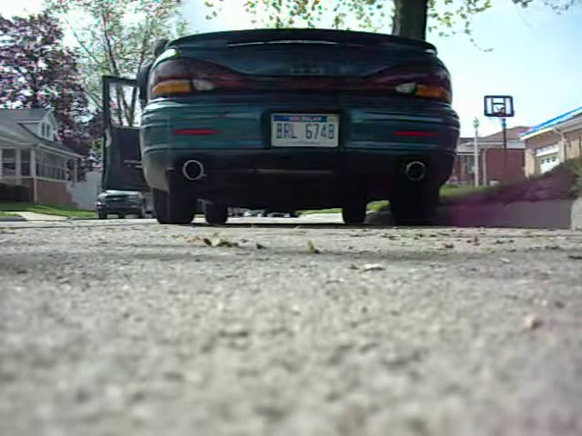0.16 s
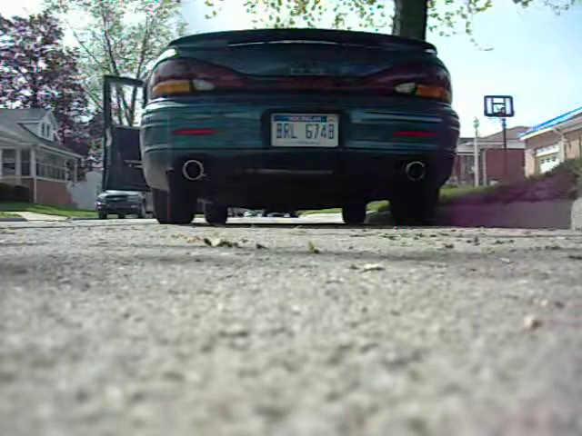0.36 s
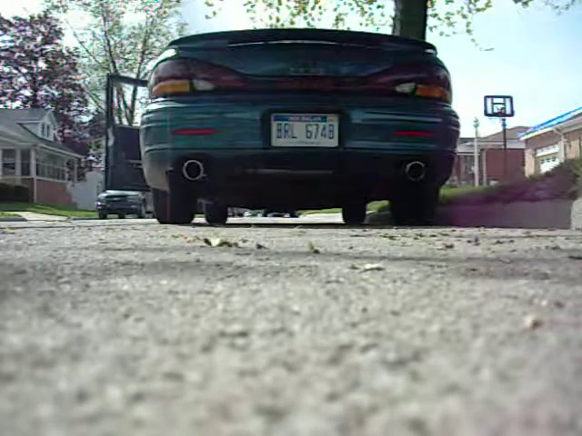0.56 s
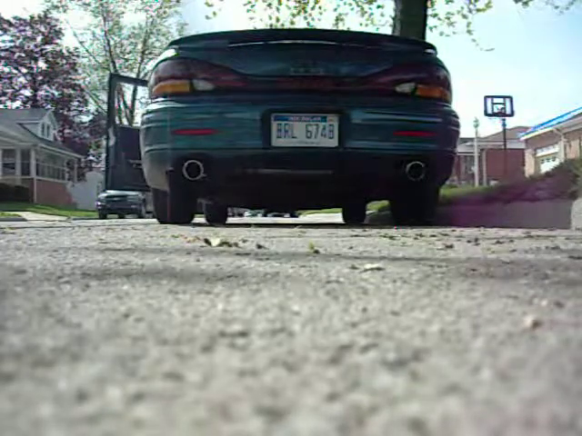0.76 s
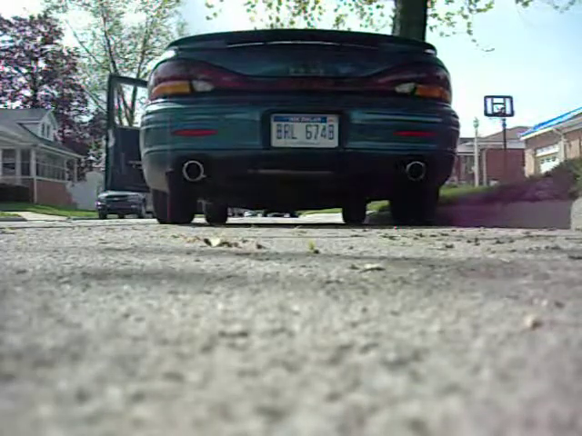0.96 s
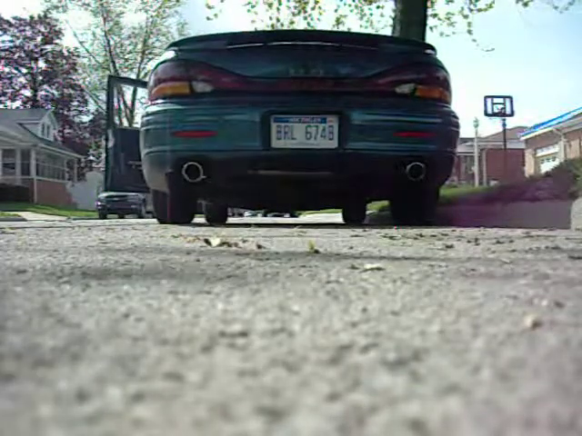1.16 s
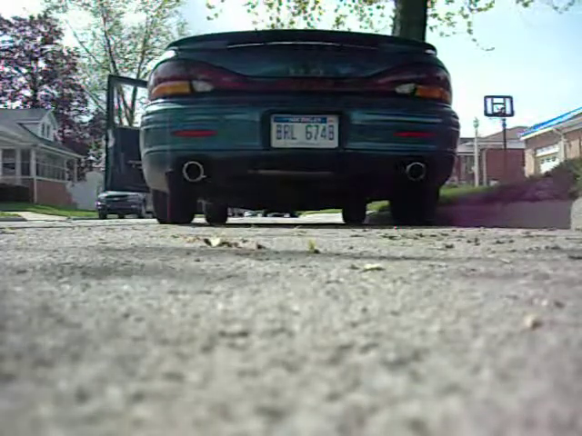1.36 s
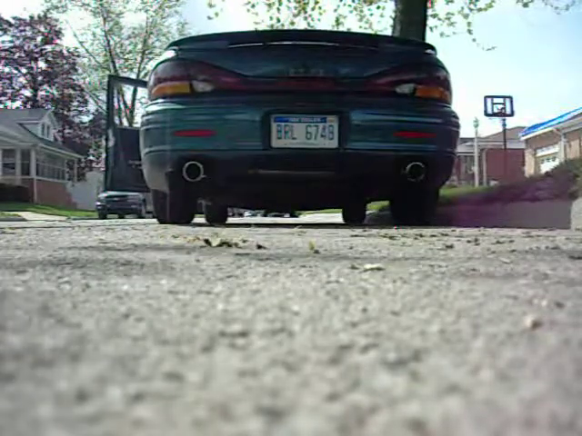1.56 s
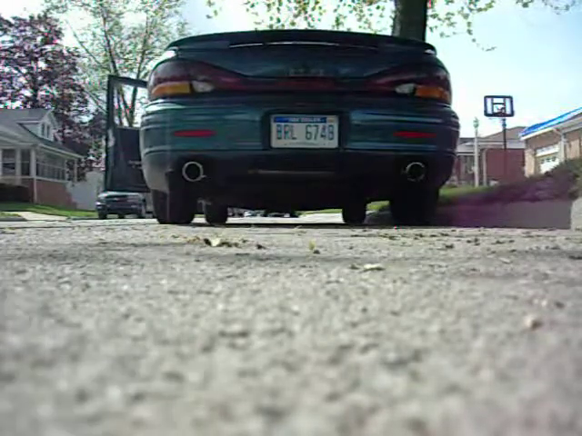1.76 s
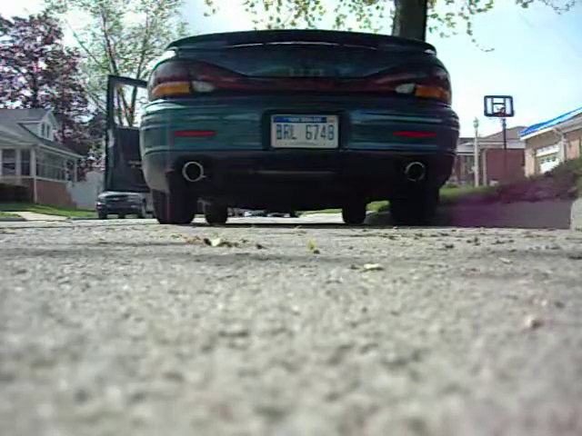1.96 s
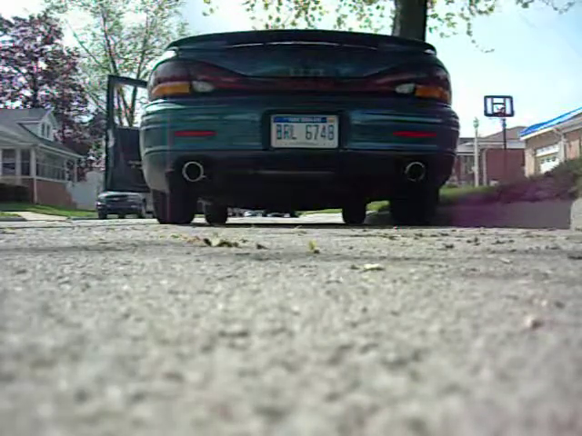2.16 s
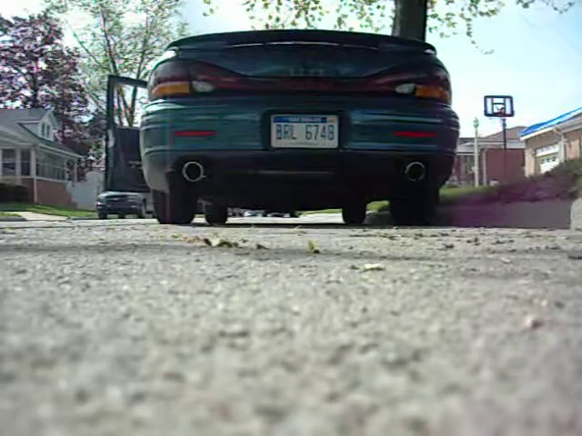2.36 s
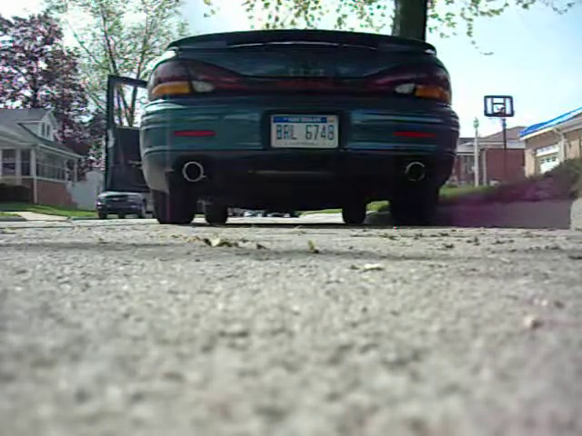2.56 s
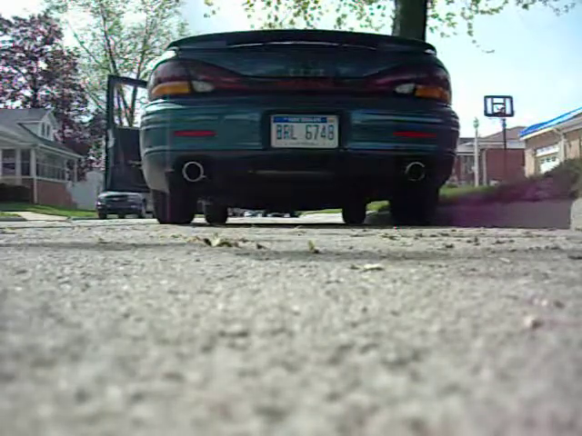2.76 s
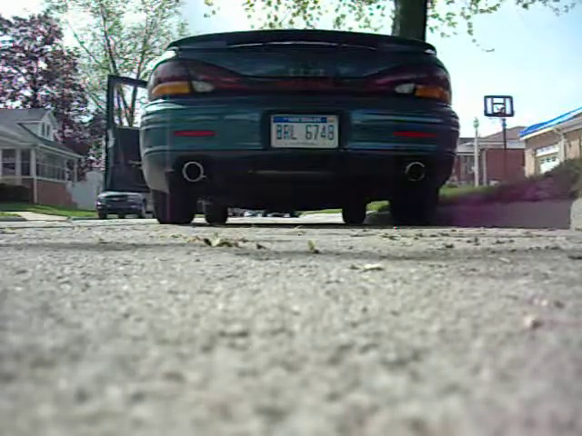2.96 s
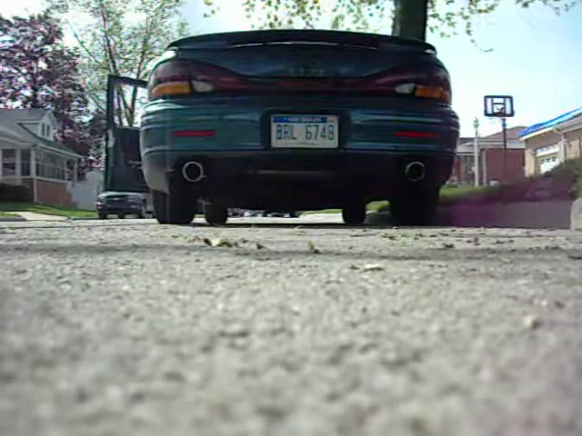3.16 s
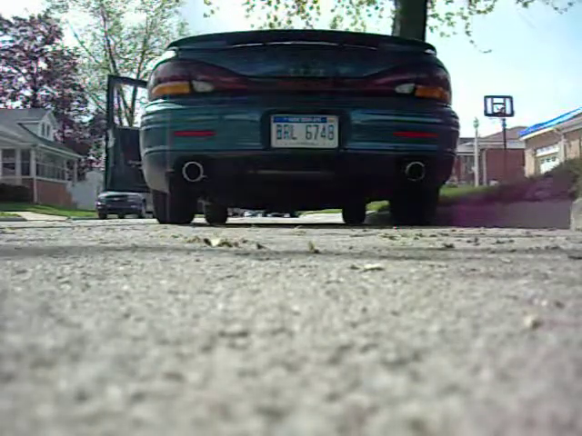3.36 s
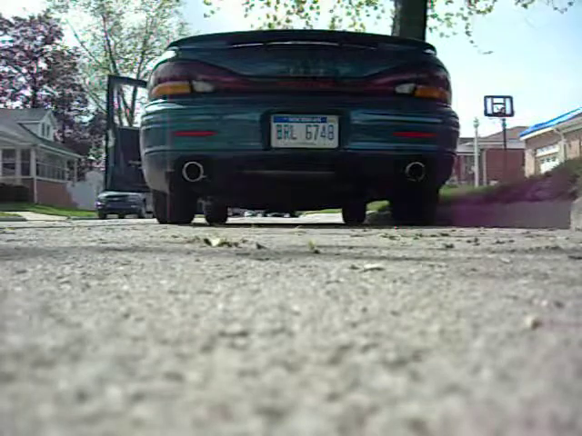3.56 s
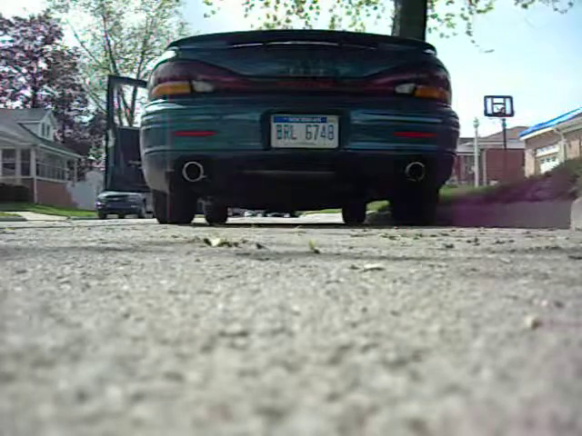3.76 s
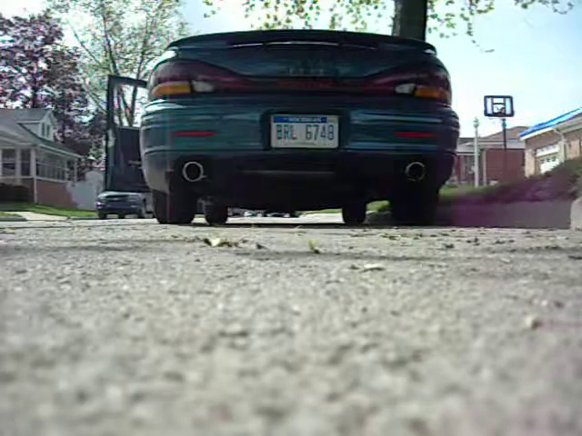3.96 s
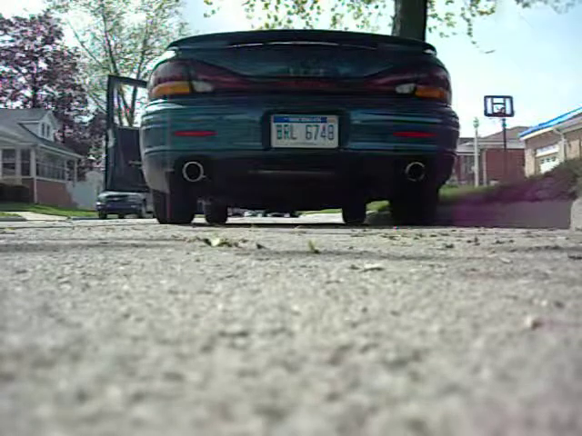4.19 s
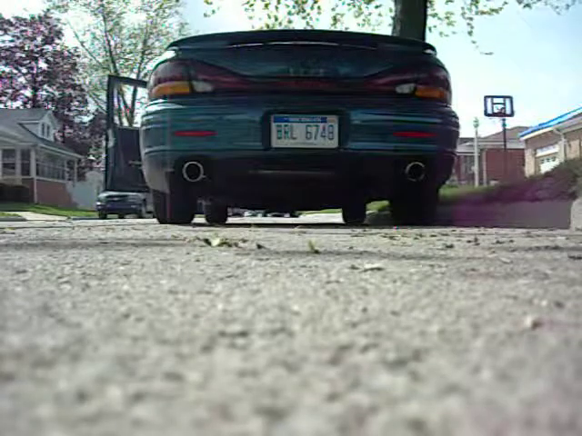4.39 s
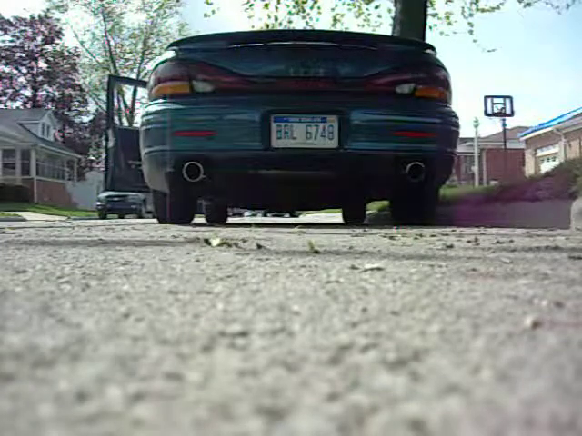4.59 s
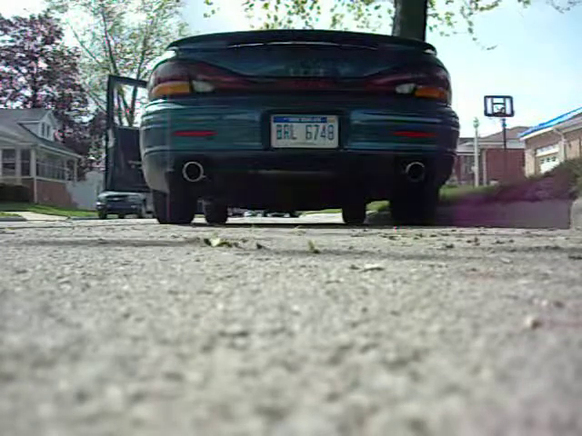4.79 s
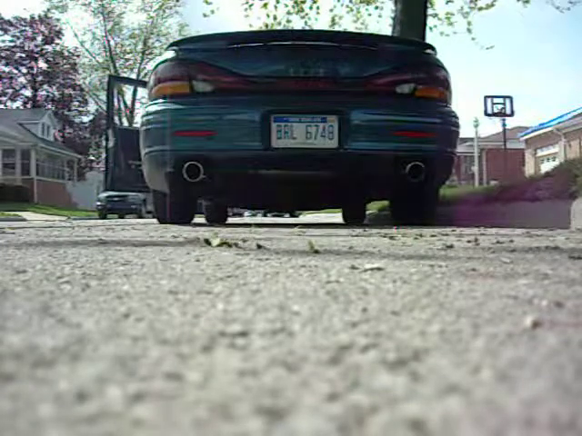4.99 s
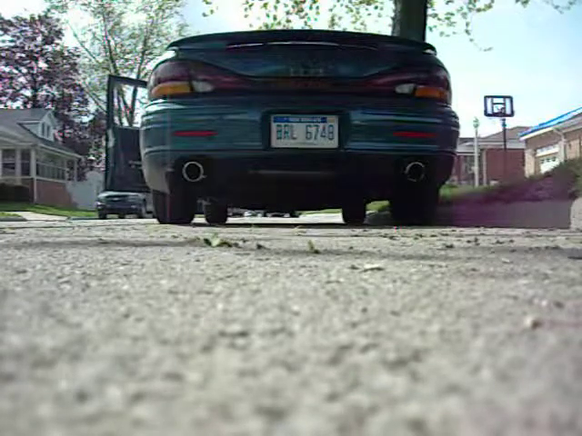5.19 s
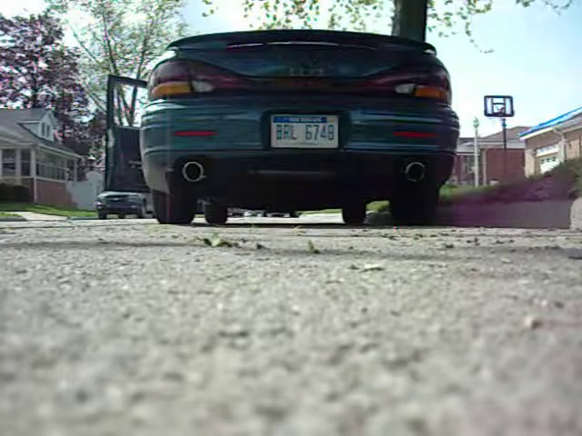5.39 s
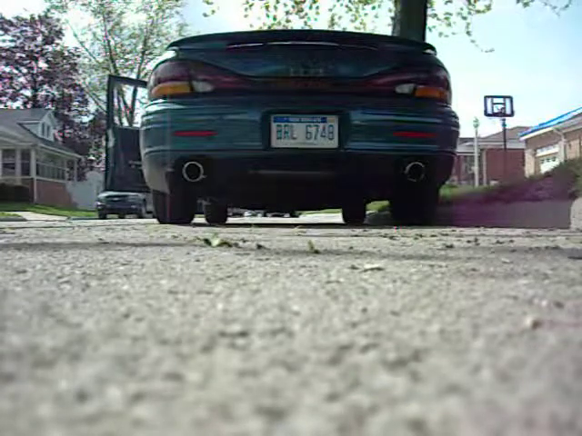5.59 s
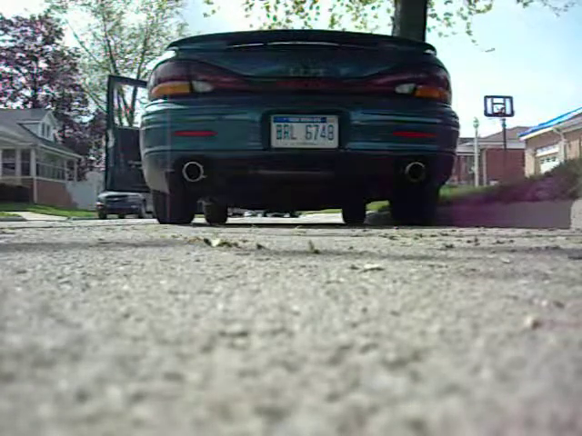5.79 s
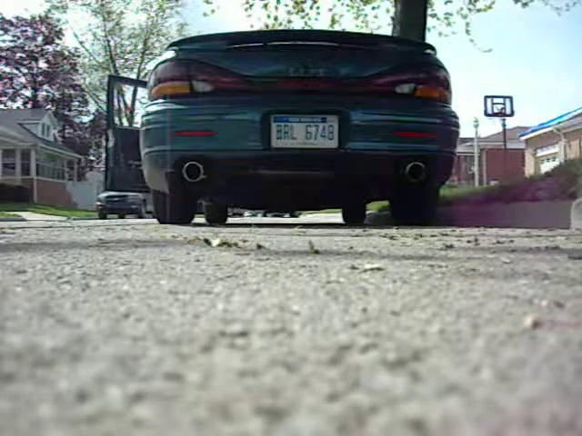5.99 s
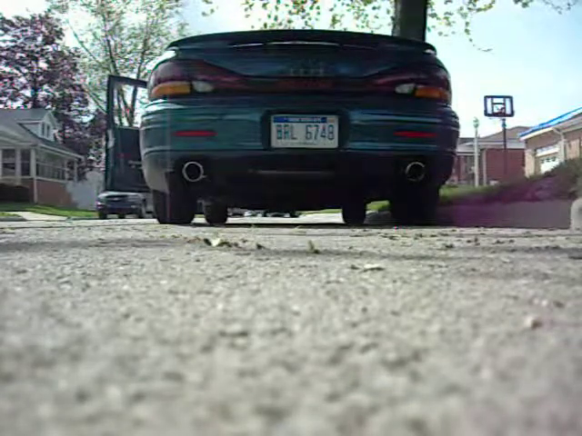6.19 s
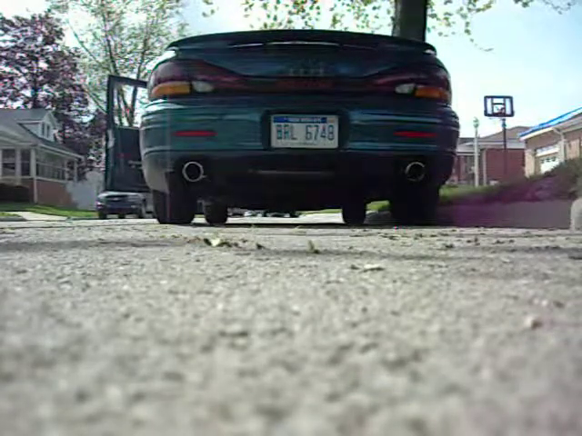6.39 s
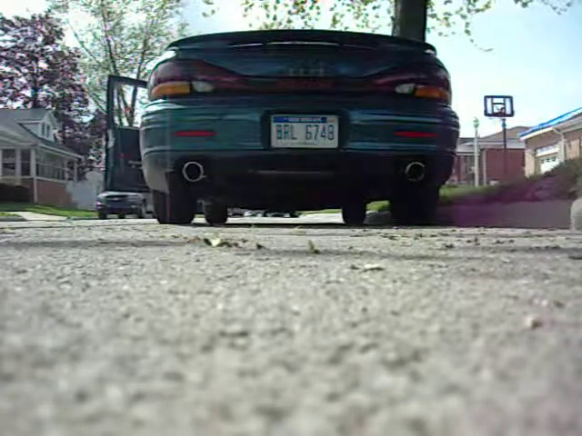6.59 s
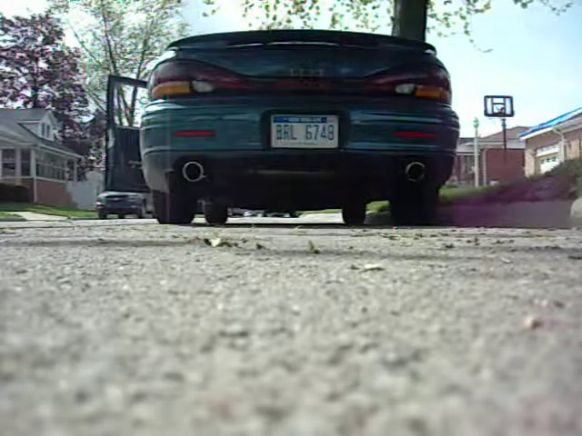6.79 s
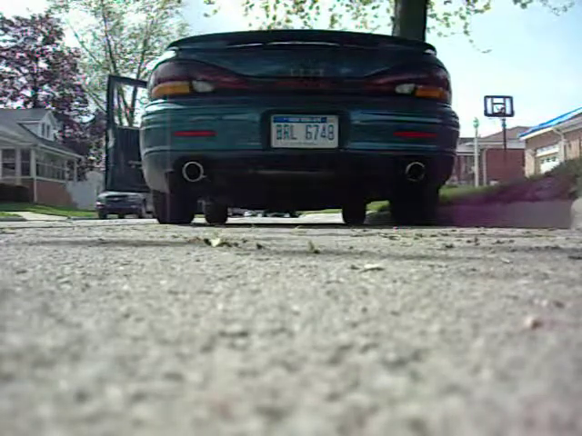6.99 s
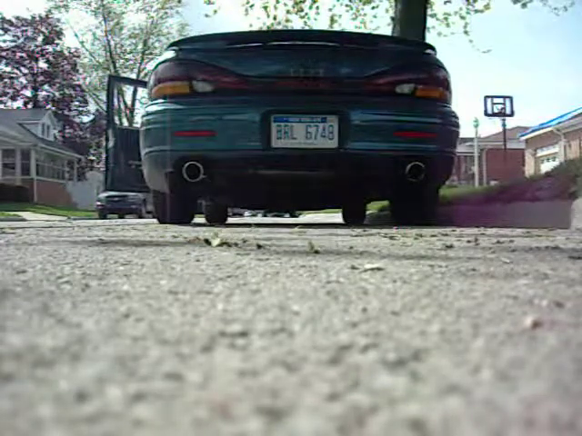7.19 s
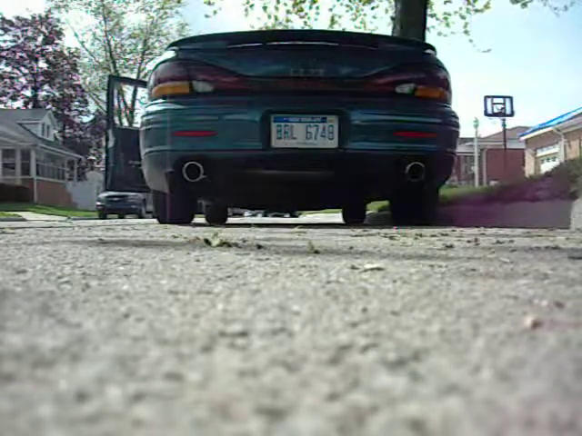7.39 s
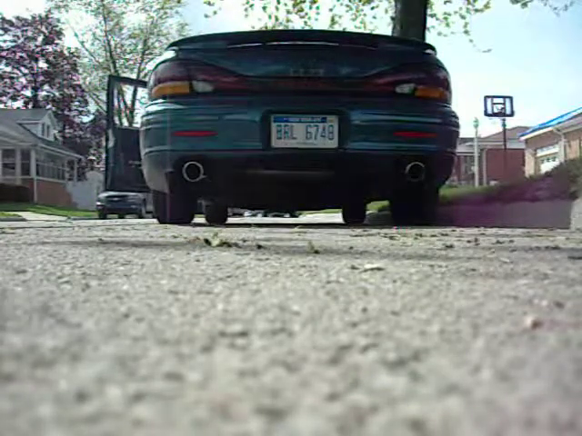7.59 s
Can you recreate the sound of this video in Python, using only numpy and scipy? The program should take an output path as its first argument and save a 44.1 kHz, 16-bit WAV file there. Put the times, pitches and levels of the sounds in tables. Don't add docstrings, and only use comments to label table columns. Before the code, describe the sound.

From the ground behind a parked car on a quiet residential street, faint traffic, sparrow chirps and small metallic key clicks come first. The starter slams in with a harsh, squealing grind, the engine catches, flares briefly, then stumbles with low thumps and pops before dropping into a throbbing, slightly uneven idle. Wind bumps the cheap, narrow-band microphone, and loud moments distort.

```python
import sys
import numpy as np
from scipy import signal
from scipy.fft import rfft, irfft, next_fast_len
from scipy.io import wavfile
from scipy.ndimage import map_coordinates

SR = 44100
rng = np.random.default_rng(int(sys.argv[2]) if len(sys.argv) > 2 else 0)


def nominal_scale(level):
    x = np.asarray(level, float) / 20
    return 10 ** x


def waveform_to_disk(signal):
    frames = np.transpose(np.atleast_2d(signal))
    scaled = np.clip(frames, -1, 1) * 32767
    samples = np.round(scaled).astype(np.int16)
    wavfile.write(sys.argv[1], SR, samples)


N = 337365
TIME = np.arange(N) / SR


def unit(x):
    return x / np.sqrt(np.mean(x ** 2) + 1e-20)


def seconds(length):
    return np.arange(int(length * SR)) / SR


def progress(length):
    return np.linspace(0, 1, round(length * SR))


def curves(rows):
    s, *cols = np.transpose(rows)
    return [np.interp(TIME, s, c) for c in cols]


def between(start, end, fade):
    return np.clip(np.minimum(TIME - start, end - TIME) / fade, 0, 1)


def swells(rows, rise, fall):
    s, hold, db = np.transpose(rows)[:, :, None]
    t = TIME[::32]
    away = rise * np.maximum(s - t, 0) + fall * np.maximum(t - s - hold, 0)
    return np.interp(TIME, t, np.linalg.norm(nominal_scale(db - away), axis=0))


def wobble(rate):
    coarse = TIME[::16]
    knots = rng.standard_normal(int(N * rate / SR) + 4)
    return np.interp(TIME, coarse, map_coordinates(knots, [coarse * rate]))


def filtered(x, response):
    m = next_fast_len(N + SR // 2)
    return irfft(rfft(x, m) * response(np.fft.rfftfreq(m, 1 / SR)), m)[:N]


def colour(points):
    f, db = np.transpose(points)
    return lambda hz: nominal_scale(np.interp(np.log(hz + 1), np.log(f + 1), db))


def modes(table):
    def response(f):
        total = 0
        for k, (c, w, db) in enumerate(table):
            total = total + (-1) ** k * nominal_scale(db) * 1j * f * w / (c * c - f * f + 1j * f * w)
        return total
    return response


def noise(response, gate=1):
    return unit(filtered(gate * rng.standard_normal(N), response))


def add(track, s, sound):
    part = track[round(s * SR):][:len(sound)]
    part += sound[:len(part)]


# f/Hz, level/dB
STREET = [(24, -31), (40, -12), (82, -1.5), (261, -11), (438, -9), (603, -9.5), (666, -7), (781, -9.5),
          (846, -10.5), (1510, -13), (1630, -13.5), (3480, -16.5), (4700, -43.5), (6110, -86),
          (10300, -120)]
# t/s, hold/s, level/dB
LEAVES = [
    (0, .01, -42.5),
    (7.2, .2, -33),
    (7.5, .2, -30),
]
# f/Hz, level/dB per Hz
FOLIAGE = [(2200, -41), (3000, -3), (3700, -4.5), (4300, -2), (4800, -40.5)]


def street():
    one_car = swells([(0.34, 0.034, -47)], rise=27, fall=47)
    level = np.hypot(nominal_scale(-45), one_car) * nominal_scale(0.86 * wobble(4.7) + 0.6)
    breeze = np.hypot(nominal_scale(-53.5), swells(LEAVES, rise=54, fall=55))
    return level * noise(colour(STREET)) + breeze * noise(colour(FOLIAGE), nominal_scale(2.9 * wobble(40)))


# t/s, hold/s, buffet level/dB
WIND = [(0, 0.0073, -41), (.45, .01, -42.5), (.7, 0.35, -47.5), (1.2, 0.17, -40.5), (1.47, .01, -36.5),
        (1.77, .01, -34.5), (2.3, 0.38, -48), (2.77, 0.27, -40), (3.19, .01, -24.5), (3.66, 0.028, -24),
        (4.73, .01, -32.5), (4.95, 0.49, -36.5), (5.73, 0.39, -26), (6.3, 0.19, -31.5), (6.8, 0.16, -31),
        (7.24, 0.0093, -29), (7.64, 0.0083, -32.5)]
# f/Hz, level/dB per Hz
RUMBLE = [(5.9, -38.5), (10, -3.5), (34, -2.5), (124, -18), (188, -28.5), (216, -30), (300, -29.5),
          (390, -61), (660, -120)]
# t/s, peak level/dB
GUSTS = [(.93, -38), (1.514, -33), (1.779, -32), (5.661, -20), (5.762, -16.5), (5.82, -15.5), (5.866, -21),
         (5.93, -21.5), (5.951, -19), (6.013, -14), (6.048, -18.5), (6.335, -23), (6.853, -20), (6.88, -28)]


def wind():
    sound = swells(WIND, rise=82, fall=76) * nominal_scale(3.5) * noise(colour(RUMBLE), nominal_scale(1.9 * wobble(17)))
    for s, db in GUSTS:
        u = np.linspace(-4, 4, round(rng.uniform(0.0065, 0.011) * SR))
        push = (u + 0.33) * np.exp(-u ** 2 / 2)
        add(sound, s - .004, rng.choice([-1, 1]) * nominal_scale(db + 4.0) * push)
    return sound


# t/s, peak level/dB, f/Hz, t60/s
KEY = [(0.168, -13, 2510, 0.012), (0.1724, -13, 2300, 0.025), (0.1842, -9.5, 2670, 0.014),
       (0.185, -16, 2340, .03), (1.5827, -21.5, 1890, 0.035), (1.672, -18, 3100, 0.03),
       (1.678, -8, 3690, 0.018), (1.733, -20.5, 2810, 0.35), (1.764, -18, 2900, 0.03),
       (1.767, -17.5, 3840, 0.04), (1.794, -32, 3330, 0.57), (1.833, -24.5, 3680, 0.62),
       (1.8808, -21.5, 3840, 0.28), (1.957, -19, 3000, 0.04), (1.965, -11, 3700, 0.04),
       (2.005, -20.5, 2900, 0.04), (2.01, -15, 3830, 0.05)]
# t/s, hold/s, level/dB
SCRAPE = [
    (1.674, 0.017, -27),
    (1.72, 0.074, -25),
    (1.825, .065, -27.5),
    (1.958, .014, -30),
    (2.01, .02, -32.5),
]
# f/Hz, width/Hz, level/dB
BARREL = [(1550, 72, 1), (2480, 120, 10.5), (2980, 160, -2.5), (3700, 200, 3)]
# f/Hz, level/dB per Hz
LOCK = [(450, -28), (800, -4.5), (1310, -13), (1560, -8), (1820, -7.5), (2490, -9), (3750, -4), (4270, -15),
        (4600, -46), (5980, -73), (10100, -120)]


def key():
    slide = between(1.66, 2.06, 0.021) * swells(SCRAPE, rise=1500, fall=170) * nominal_scale(-5.0)
    sound = slide * noise(lambda f: colour(LOCK)(f) * (1 + modes(BARREL)(f)), nominal_scale(2.3 * wobble(200)))
    t = seconds(0.1)
    attack = np.minimum(t / 0.00069, 1)
    for s, db, hz, t60 in KEY:
        partner = hz * rng.uniform(0.73, 0.94)
        ring = np.sin(2 * np.pi * hz * t) + 0.34 * np.sin(2 * np.pi * partner * t)
        rasp = 0.5 * rng.standard_normal(len(t))
        decay = nominal_scale(db - 5 - 60 * t / np.clip(t60, .006, .05))
        add(sound, s, decay * (ring + rasp) * attack)
    return filtered(sound, lambda f: f ** 2 / (f ** 2 + 1100 ** 2))


# t/s, length/s, start f/Hz, peak level/dB
SLURS = [
    (1.058, 0.032, 4116, -29),
    (1.095, 0.024, 3750, -30.5),
    (1.285, .034, 4000, -32.5),
]
CHIRPS = [(.201, 0.049, 3850, -41), (.922, 0.052, 3400, -37), (1.374, 0.045, 2700, -46),
          (1.075, 0.017, 3780, -32), (1.263, 0.028, 3980, -38), (4.294, .018, 3900, -24),
          (4.316, 0.017, 3820, -25), (4.33, .03, 3640, -26.5), (7.073, 0.03, 3900, -25.5),
          (7.128, .025, 3700, -24), (7.194, 0.014, 3830, -28)]
SLIDES = [
    (.238, 0.025, 3780, -45),
    (.8, .12, 3070, -39),
    (1.5, 0.16, 3140, -41.5),
    (0.96, 0.11, 3640, -49),
]
WHISTLES = [
    (.688, 0.03, 3530, -26),
    (.67, 0.17, 3110, -44),
    (.69, 0.1, 2330, -50),
    (1.31, 0.37, 3110, -46),
    (1.42, 0.042, 2635, -37),
    (2.03, 0.19, 3470, -53),
]
LIFTS = [
    (.822, .024, 3950, -30.5),
    (0.93, 0.01, 2950, -37),
    (.522, 0.027, 3830, -33),
    (.995, 0.055, 3890, -34.5),
    (1.496, 0.083, 1500, -45),
]
DROPS = [
    (.509, .024, 4260, -30.5),
]
GLIDES_HZ_PER_S = (-23000, -10500, -2200, -300, 2605, -36000)


def birds():
    sound = np.zeros(N)
    for calls, glide in zip((SLURS, CHIRPS, SLIDES, WHISTLES, LIFTS, DROPS), GLIDES_HZ_PER_S):
        for s, length, start_hz, db in calls:
            u = progress(length)
            quaver = 60 * np.interp(u, np.linspace(0, 1, 40), rng.standard_normal(40))
            pitch = start_hz + glide * length * u ** .65 + quaver
            swell = np.sin(np.pi * u ** .75) ** 0.7
            add(sound, s, nominal_scale(db) * swell * np.sin(2 * np.pi * np.cumsum(pitch) / SR))
    t = seconds(1 / 3)
    walls = rng.standard_normal(len(t)) * nominal_scale(-60 * t / 0.31) * (t > .01)
    echo = signal.fftconvolve(sound, walls / np.linalg.norm(walls))[:N]
    return sound * nominal_scale(2.3 * wobble(90)) + nominal_scale(-7.5) * echo


# t/s, hold/s, grind level/dB
CRANK = [
    (2.746, .008, -13),
    (2.767, .01, -12),
    (2.792, .012, -10.5),
    (2.928, 0.011, -13),
    (3.099, .19, -9.5),
]
# t/s, hold/s, grind level/dB
BITES = [
    (2.621, 0.022, -4),
    (3.016, .042, -10),
]
# t/s, hold/s, grind level/dB
FREE = [
    (2.66, .07, -19.5),
    (2.82, .09, -24.5),
    (2.876, 0.01, -19.5),
    (2.95, 0.076, -15.5),
    (3.3, 0.082, -23.5),
]
# f/Hz, width/Hz, level/dB
GEARS = [(1850, 75, -7), (2393, 17, -2.5), (2750, 46, -4.5), (3110, 250, -1.5), (3210, 45, 1.5),
         (3560, 41, -1), (3900, 810, 2.5)]
# f/Hz, level/dB per Hz
HOUSING = [(710, -48.5), (1200, -20), (1440, -15.5), (1860, -6), (2550, -10.5), (2750, -4.5), (3150, -2.5),
           (3700, -6.5), (4700, -25.5), (6110, -66), (10300, -120)]


def starter():
    strokes = swells(CRANK, rise=550, fall=450)
    bites = swells(BITES, rise=1900, fall=470)
    load = np.linalg.norm([strokes, bites, swells(FREE, rise=210, fall=300)], axis=0)
    freed = [(s + hold + 0.018, .01, db - 23) for s, hold, db in CRANK]
    freed += [(s + hold, .01, db - 22) for s, hold, db in BITES]
    freed += [(2.8, .045, -28), (2.6, .5, -37.5), (3.15, .4, -25.5)]
    loose = swells(freed, rise=460, fall=280)
    teeth = nominal_scale(1.5 * wobble(300))
    whine = np.zeros(N)
    for hz, width, db in GEARS:
        phase = 2 * np.pi * np.cumsum(hz * (1 + .022 * wobble(22))) / SR
        whine += nominal_scale(db + 3.0 * wobble(40)) * wobble(1.2 * width) * np.sin(phase)
    grind = .3 * unit(whine) + 0.7 * noise(colour(HOUSING), teeth)
    growl = noise(modes([(510, 190, -13), (787, 55, 3.5), (985, 76, 4.5), (1350, 110, 3.5)]), teeth)
    return between(2.605, 3.42, 0.02) * (load * grind + loose * growl)


# t/s, length/s, f/Hz, level/dB
SQUEALS = [(2.622, 0.038, 3158, -3.5), (2.624, 0.052, 3560, -18), (2.665, 0.043, 1900, -26),
           (2.698, .02, 2410, -23), (2.745, .038, 3610, -12.5), (2.75, 0.04, 1800, -25.5),
           (2.748, .009, 3510, -11), (2.792, .012, 2895, -10), (2.937, .01, 2997, -10.5),
           (2.765, .033, 3270, -10), (2.778, 0.023, 2892, -9.5), (2.8, 0.024, 3130, -17),
           (2.878, 0.018, 2860, -20), (2.9, 0.031, 2420, -16.5), (2.912, .04, 1850, -18),
           (2.922, 0.035, 2790, -12), (2.924, .03, 3225, -14), (2.948, 0.0203, 2060, -22),
           (3.016, 0.032, 3080, -9), (3.03, 0.039, 2060, -21.5), (3.034, 0.025, 3680, -16.5),
           (3.044, 0.022, 2840, -16), (3.066, 0.032, 3160, -14), (3.099, 0.027, 3220, -13),
           (3.13, .032, 1930, -17.5), (3.134, .028, 3665, -15.5), (3.143, 0.022, 2850, -17.5),
           (3.25, 0.017, 3270, -19), (3.272, 0.033, 1680, -13), (3.274, 0.023, 3750, -13),
           (3.277, .02, 3150, -15)]


def squeals():
    sound = np.zeros(N)
    for s, length, hz, db in SQUEALS:
        u = progress(length)
        phase = 2 * np.pi * np.cumsum(hz * (1 - .02 * u)) / SR
        add(sound, s, nominal_scale(db) * np.sin(np.pi * u ** 0.57) * np.sin(phase))
    return sound


# t/s, peak level/dB, thud level/dB
KNOCKS = [
    (2.623, -1.5, -0.5),
    (2.772, -10.5, -23.5),
    (2.79, -9, -20.5),
    (2.926, -12, -22),
    (3.019, 3.5, -24.5),
    (3.053, -8, -20),
    (3.095, -10, -22.5),
]


def pinion():
    sound, t = np.zeros(N), seconds(1 / 8)
    soften = signal.butter(2, 1100, fs=SR)
    for s, db, thud_db in KNOCKS:
        clang = np.zeros(len(t))
        for hz, _, level in GEARS:
            struck = nominal_scale(level + rng.normal(0, 2.8))
            clang += struck * np.sin(2 * np.pi * hz * rng.normal(1, 0.013) * t)
        dull = unit(signal.lfilter(*soften, rng.standard_normal(len(t))))
        thud = nominal_scale(thud_db - 60 * t / 0.072) * dull
        add(sound, s, nominal_scale(db - 14.0) * (nominal_scale(-60 * t / 0.078) * clang + thud))
    return sound


# f/Hz, width/Hz
NOTCHES = [(492, 20), (772, 17), (890, 44)]


def notched(f):
    return np.prod([(c * c - f * f + .3j * f * w) / (c * c - f * f + 1j * f * w) for c, w in NOTCHES], axis=0)


# f/Hz, width/Hz, level/dB
PIPE = [(287.5, 36, -1.5), (404.7, 41, 1), (467, 32, 1.5), (600, 60, -1.5), (682.7, 34, 3), (791, 63, -7)]


def roar(turn, cycle, effort_db, octaves):
    firing = 1 + 0.16 * np.cos(2 * turn) + 0.14 * np.cos(3 * turn)

    def pipe(table, swing):
        response = lambda f: modes(table)(f) * notched(f) * f ** 4 / (f ** 4 + 300 ** 4)
        return noise(response, (firing + swing) * nominal_scale(.6 * wobble(25)))

    level_db = -31 + 0.72 * effort_db + 4.5 * octaves
    lower = nominal_scale(level_db - 6.5) * pipe(PIPE[:3], 0.17 * np.cos(cycle + 2.5))
    upper = nominal_scale(level_db - 4.0) * pipe(PIPE[3:], .24 * np.cos(cycle))
    clears = .62 + (1 - .62) * between(2.5, 9, .05)
    return clears * (lower + upper)


# t/s, hold/s, level/dB
BARKS = [
    (3.085, 0.093, -22),
    (3.21, .05, -23),
    (3.3, 0.09, -19),
    (3.4, .13, -23),
]
# f/Hz, width/Hz, level/dB
UPPER_PIPE = [(250, 80, -11.5), (438, 70, -2.5), (554, 68, -4.5), (606, 33, 0), (681, 55, -4),
              (796, 89, -11)]


def bark(turn):
    jittered = 2 * turn + .16 * wobble(30) + 0.21 * np.sin(turn)
    pulses = np.exp(130 * (np.cos(jittered) - 1)) * nominal_scale(2.0 * wobble(60))
    gas = np.exp(.8 * np.cos(2 * turn)) * rng.standard_normal(N)
    blast = .66 * 3 * unit(pulses) + (1 - .66) * unit(gas)
    ringing = filtered(blast, lambda f: modes(UPPER_PIPE)(f) * f ** 3 / (f ** 3 + 300 ** 3))
    return swells(BARKS, rise=810, fall=420) * unit(ringing)


# order, level/dB, share of effort
ORDERS_LOW = [(2, 0.9, 1.013), (3, -4.5, 1.3), (4, -0.43, 0.38)]
# order, level/dB re order 3
UPPER = [(5, -13), (6, -19.5), (7, -16.5), (8, -35), (9, -34), (2.5, -20), (3.5, -24.5)]
# f/Hz, level/dB
MUFFLER = [(38, -26), (45, -21.5), (51, -16), (60, -16.5), (70, -21), (91, -19.5), (101, -27.5), (160, -35)]
# t/s, hold/s, level/dB
MISSED = (3.62, 0.09, -19)


def throb(turn, beat_hz, effort_db):
    cut = swells([MISSED], rise=130, fall=230)
    coasting = swells([(3.58, 0.51, 0)], rise=230, fall=120)
    loaded = np.clip(effort_db / 9, 0, 1)
    twist_rad = {3: -1.2, 4: 0.98}
    gains = {}
    for order, db, share in ORDERS_LOW:
        gains[order] = nominal_scale(db + share * effort_db) * colour(MUFFLER)(order * beat_hz)
    gains[3] = gains[3] * nominal_scale(-21 * cut / cut.max() - 3.5 * between(3, 3.25, .03))
    for order, db in UPPER:
        gains[order] = gains[3] * nominal_scale(db - 8.5 * coasting - 0.27 * effort_db)
    gains[0.95] = cut
    sound = np.zeros(N)
    for order, gain in gains.items():
        chance = wobble(16)
        ragged = nominal_scale(0.87 * chance - 4.5 * coasting * np.abs(chance))
        lag = twist_rad.get(order, 0) * loaded - .4 * (order - 3) ** 2
        sound += np.sqrt(2) * gain * ragged * np.sin(lag - order * turn)
    return sound


# t/s, hold/s, level/dB
STUMBLE = [
    (3.1, 0.5, -31),
    (3.58, 0.24, -19),
    (3.98, 0.012, -25),
    (4.1, 4.7, -37),
]
# f/Hz, level/dB per Hz
BURBLE = [(30, -14.5), (42, 5), (95, 0), (150, -5), (200, -26), (300, -48.5)]


def burble():
    return swells(STUMBLE, rise=66, fall=120) * noise(colour(BURBLE))


# f/Hz, level/dB per Hz
BAY = [(120, -51), (170, -18), (330, -14), (450, -7.5), (650, -3), (890, -8), (1660, -9.5), (1880, -3.5),
       (2220, -8.5), (3510, -6.5), (3900, -12.5), (4320, -27), (4700, -49), (6000, -120)]
# f/Hz, width/Hz, level/dB
COVERS = [(1540, 39, 0.5), (1900, 17, -9), (2780, 78, -3), (3600, 150, -23.5)]


def clatter(turn, cycle, effort_db, octaves):
    swing = 1 + 0.043 * np.cos(4 * turn) + .072 * np.cos(cycle + 1)
    valves = swing * nominal_scale(0.78 * wobble(60) + 0.37 * wobble(5.7))
    bay = noise(lambda f: colour(BAY)(f) * notched(f) * (1 + .5 * modes(COVERS)(f)), valves)
    return nominal_scale(-28 + 0.44 * effort_db + 5.5 * octaves + 0.9) * bay


# t/s, exhaust beat f/Hz, effort level/dB re idle
ENGINE = [(3.07, 18.5, 2), (3.132, 21.6, 8.5), (3.22, 28.6, 11.5), (3.296, 37.4, 14), (3.396, 41, 10.5),
          (3.512, 42.7, 8), (3.572, 38.5, 4), (3.668, 39, 3.5), (3.8, 36.8, -3), (3.966, 27.7, -2),
          (4.048, 28.3, -2), (4.3, 24.6, -0.5), (4.6, 23.37, 0), (5.1, 22.05, -0.5), (5.75, 22.7, 1),
          (6.3, 22.75, 0.5), (7.15, 23.8, 1), (7.65, 24.1, 3)]


def engine():
    beat_hz, effort_db = curves(ENGINE)
    octaves = np.log2(beat_hz / 23)
    turn = 2 * np.pi * np.cumsum(beat_hz * (1 + 0.005 * wobble(9))) / SR
    cycle = (turn - turn[round(7.255 * SR)]) / 3
    exhaust = bark(turn) + roar(turn, cycle, effort_db, octaves)
    low = throb(turn, beat_hz, effort_db) + burble()
    bonnet = clatter(turn, cycle, effort_db, octaves)
    return between(3.072, 9, 0.026) * exhaust + between(3.095, 9, 0.022) * low + between(3.124, 9, 0.081) * bonnet


# t/s, peak level/dB
STRAYS = [
    (3.096, -9.5),
    (3.632, -6.5),
    (3.682, -20),
    (3.712, -12.5),
    (3.733, -4.5),
    (3.756, -13),
    (3.79, -16.5),
    (3.85, -13),
    (3.92, -11.5),
    (3.951, -9.5),
]


def strays():
    sound, t = np.zeros(N), np.arange(-SR // 32, SR // 32) / SR
    thump = np.exp(-(t / .0075) ** 2 / 2) * np.cos(2 * np.pi * 62 * t)
    for s, db in STRAYS:
        add(sound, s + t[0], nominal_scale(db) * thump)
    return sound


# t/s, length/s, f/Hz, level/dB
POPS = [(3.59, 0.024, 393, -22.5), (3.597, .03, 600, -26), (3.651, 0.043, 416, -11),
        (3.651, 0.023, 580, -12.5), (3.652, 0.016, 728, -24), (3.633, .03, 327, -23),
        (3.7, 0.019, 640, -22), (3.764, 0.035, 600, -26), (3.722, .035, 429, -21), (3.724, 0.031, 302, -25),
        (3.774, .035, 455, -18.5), (3.815, .04, 318, -28.5), (3.905, 0.028, 422, -28),
        (3.912, 0.028, 683, -28.5)]
# t/s, peak level/dB
HOOTS = [
    (4.36, -26.5),
    (7.105, -25),
    (7.235, -25),
    (7.36, -26),
    (7.485, -36),
]


def afterfire():
    sound, t = np.zeros(N), seconds(0.1)
    for s, length, hz, db in POPS:
        u = progress(length)
        flutter = 1 + .6 * np.interp(u, np.linspace(0, 1, 12), rng.standard_normal(12))
        flare = flutter * np.sin(np.pi * u ** 0.46)
        add(sound, s, nominal_scale(db) * flare * np.sin(2 * np.pi * hz * length * u))
    hoot = np.sin(np.pi * np.minimum(t / 0.052, 1)) * np.sin(2 * np.pi * 672 * t)
    for s, db in HOOTS:
        add(sound, s, nominal_scale(db) * hoot)
    return sound


def scene():
    surroundings = street() + wind() + key() + birds()
    cranking = starter() + squeals() + pinion()
    return (surroundings + cranking + engine() + strays() + afterfire())[None]


def top_cut(x):
    return signal.sosfilt(signal.butter(12, 15900, fs=SR, output="sos"), x)


# f/Hz, level/dB
EDGE = [(3800, 0.5), (4050, -6.5), (4300, -16), (4550, -40), (4700, -100)]


def record(dry):
    saturated = dry[0] / (1 + np.abs(dry[0] / 0.69) ** 8) ** (1 / 8)
    heard = filtered(saturated, colour([(4000, 0.5), (4600, -9.5), (5200, -94.0)]))
    mirrored = heard * (1 + 2 * np.cos(2 * np.pi * 8000 * TIME))
    flattened = np.clip(filtered(mirrored, colour(EDGE)), -.722, .722)
    return top_cut(flattened[None])


dry = scene()
out = record(dry)
waveform_to_disk(out)
```